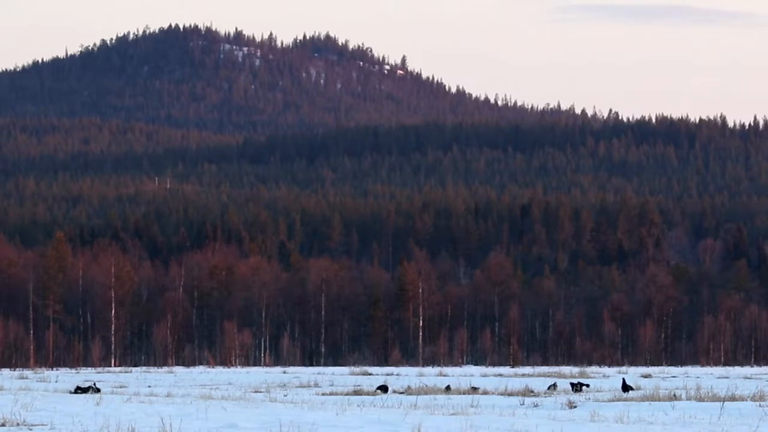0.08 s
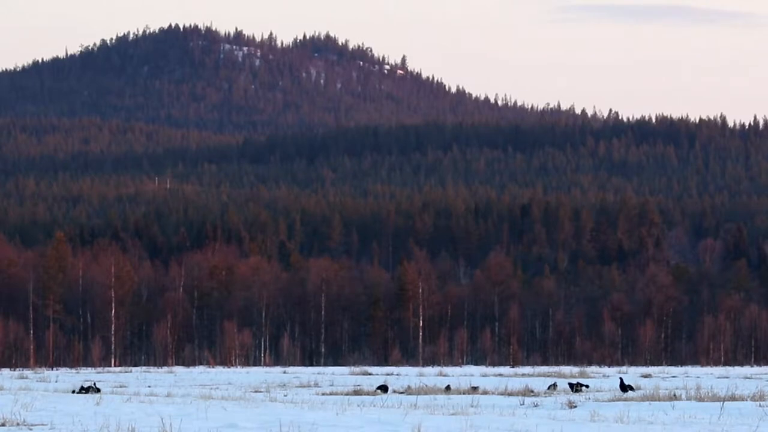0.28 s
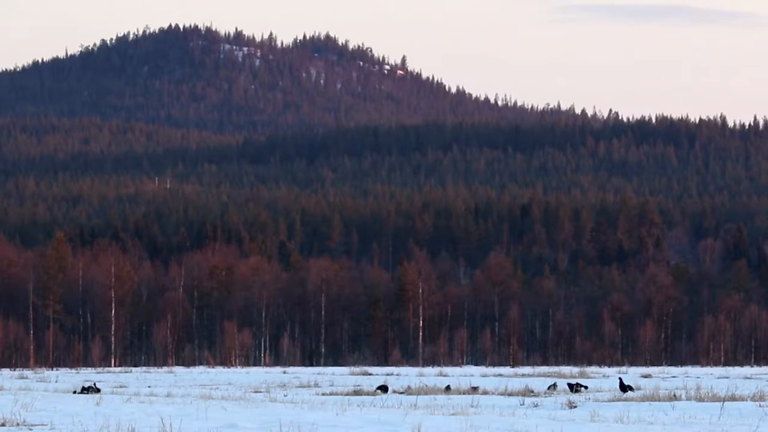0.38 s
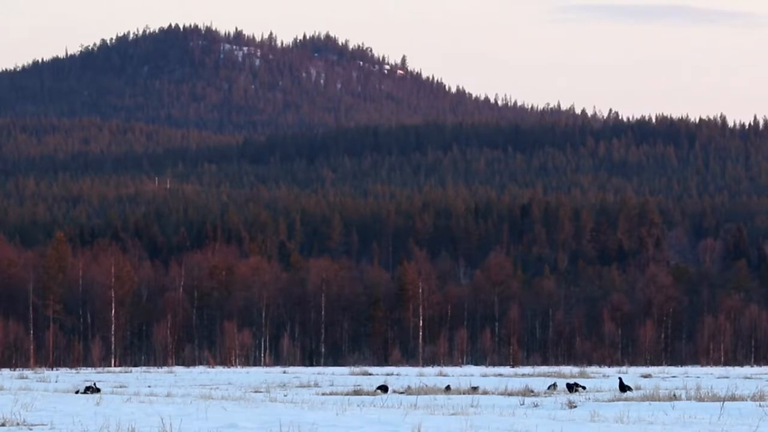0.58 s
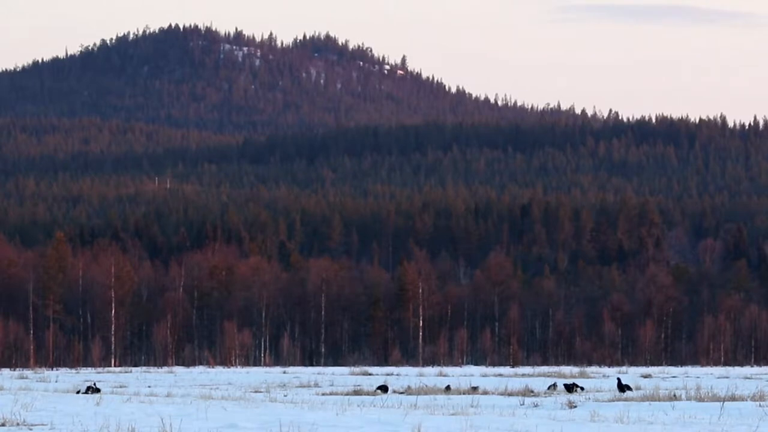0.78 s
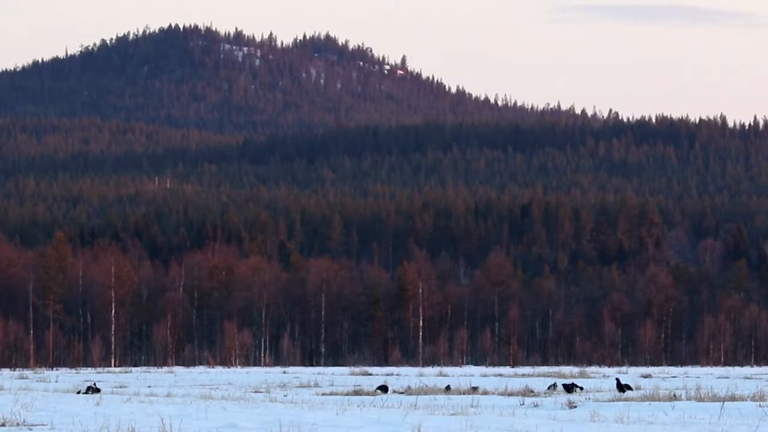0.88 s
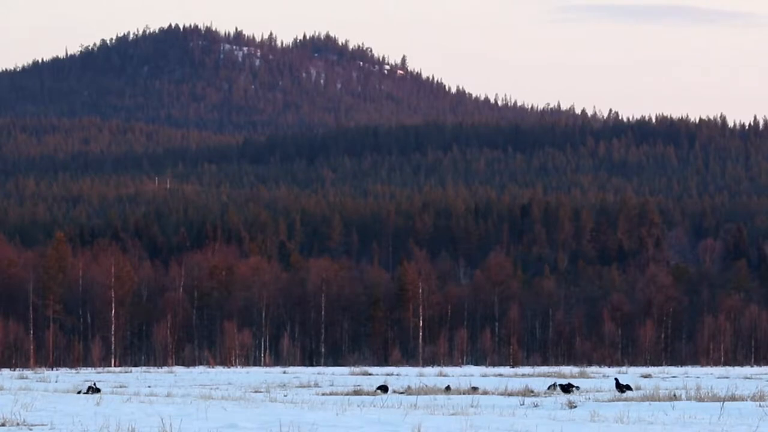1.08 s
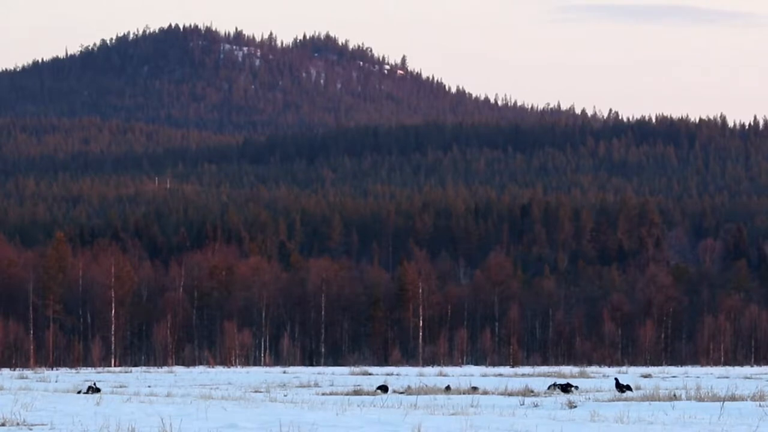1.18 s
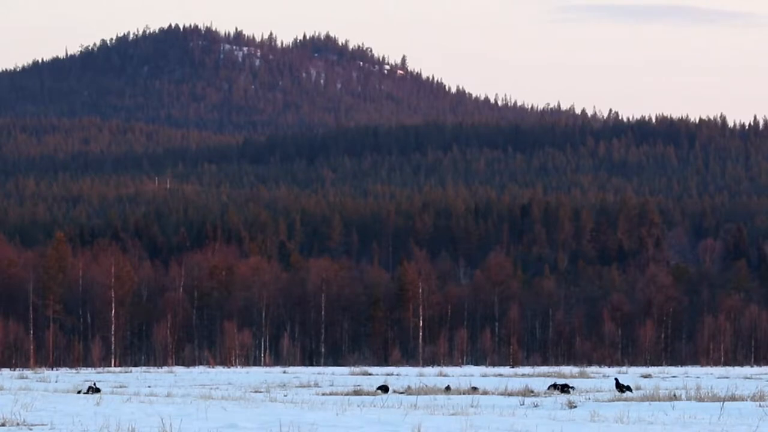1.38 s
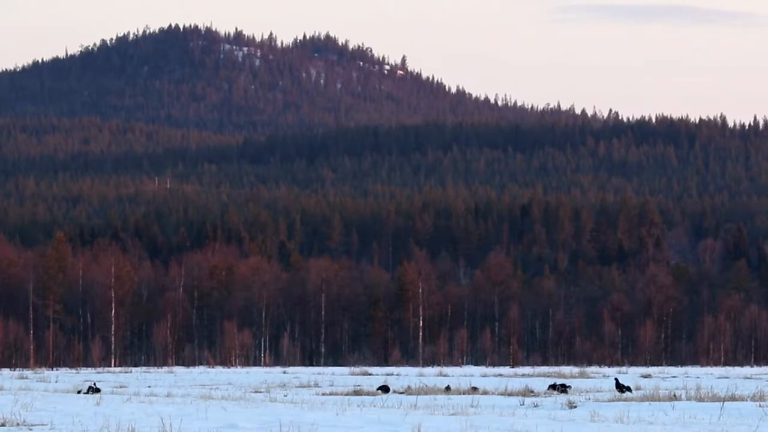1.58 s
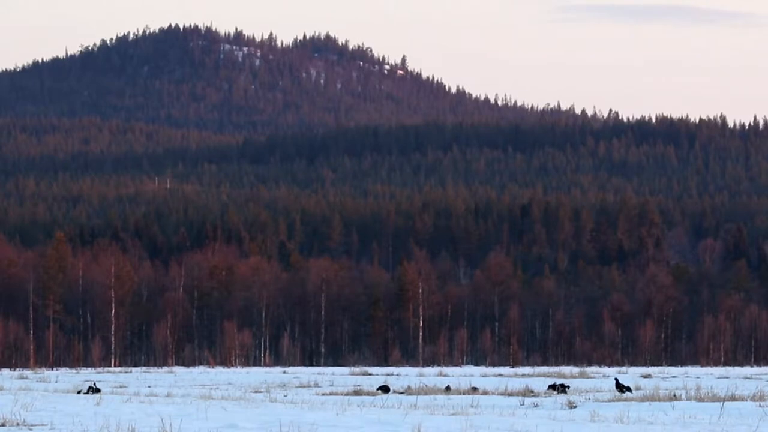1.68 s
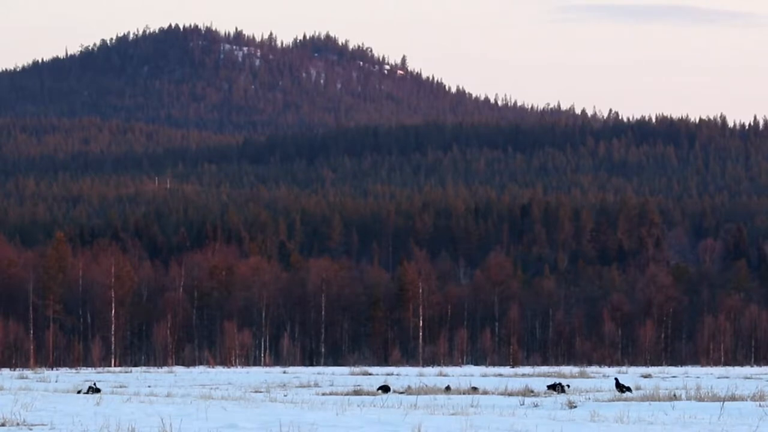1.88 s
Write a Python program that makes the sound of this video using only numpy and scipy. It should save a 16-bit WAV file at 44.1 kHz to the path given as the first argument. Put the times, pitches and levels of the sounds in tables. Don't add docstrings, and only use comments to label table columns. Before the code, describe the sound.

Hoarse, whistling two-part grouse hiss, with steady low bubbling, soft coos and faint wind

```python
import sys
import numpy as np
from scipy import signal
from scipy.io import wavfile
from scipy.ndimage import uniform_filter1d, map_coordinates

SR = 44100
rng = np.random.default_rng(int(sys.argv[2]) if len(sys.argv) > 2 else 0)


def master(y):
    cut = np.clip(np.atleast_2d(y).T, -1, 1)
    pcm = np.round(cut * 32767)
    wavfile.write(sys.argv[1], SR, pcm.astype(np.int16))


def elevation(decibels):
    levels = np.asarray(decibels, float)
    return 10 ** (levels / 20)


N = 83790


def evened(x):
    return x / np.sqrt(np.mean(abs(x) ** 2) + 1e-20)


def read(points, hz):
    f, value = np.transpose(points)
    return np.interp(np.log(hz + 1), np.log(f + 1), value)


def pan(db):
    return elevation(np.array([[.5], [-.5]]) * db)


def add(mix, start_s, sound):
    at = max(round(start_s * SR), 0)
    part = mix[:, at:at + sound.shape[1]]
    part += sound[:, :part.shape[1]]


def whistle(hz, width_hz, flatten=0):
    turn = np.exp(2j * np.pi * np.cumsum(hz * np.ones(N)) / SR)
    pace = np.cumsum(width_hz * np.ones(N)) / SR
    rows = rng.standard_normal((4000, 2))
    real, imaginary = (map_coordinates(row, [pace], order=3) for row in rows.T)
    z = real + 1j * imaginary
    return evened((turn * z / (abs(z) + .25) ** flatten).real)


def band(lo_hz, hi_hz):
    edges = signal.butter(3, [lo_hz, hi_hz], "band", fs=SR, output="sos")
    return evened(signal.sosfilt(edges, rng.standard_normal(N)))


def note(level_db, length_s, from_hz, to_hz, peak_at, pan_db):
    u = np.arange(0, length_s, 1 / SR) / length_s
    shape = np.sin(np.pi * u ** (np.log(.5) / np.log(peak_at))) ** 1.4
    a, b = rng.random(2)
    wobble = 1 + .012 * np.sin(2 * np.pi * (a + 1.31 * u))
    hz = (from_hz + (to_hz - from_hz) * u) * wobble
    return elevation(level_db) * pan(pan_db) * shape * np.sin(2 * np.pi * (b + np.cumsum(hz) / SR))


# (pitch [Hz], level [dB per Hz])
AIR_COLOUR = [(20, -7), (60, 0), (200, -4), (330, -0.5), (700, -9.5), (1400, -13.5), (3000, -18),
              (16000, -19)]
# (pitch [Hz], likeness [-1 to 1])
AIR_LIKENESS = [(30, 0.76), (300, 0.86), (700, 0.39), (2000, 0.1), (5000, 0.17), (15000, 0.033)]


def air():
    frames, hz = N // 256 + 5, np.fft.rfftfreq(1024, 1 / SR)
    a, b, c, d, patches = rng.standard_normal((frames, 513, 5)).T
    patches = evened(uniform_filter1d(uniform_filter1d(patches, 8, 0), 14, 1))
    same = np.clip(read(AIR_LIKENESS, hz), -1, 1)[:, None]
    left = a + 1j * b
    right = same * left + np.sqrt(1 - same ** 2) * (c + 1j * d)
    z = np.array([left, right]) * elevation(read(AIR_COLOUR, hz)[:, None] + .8 * patches)
    return elevation(-36.5) * evened(signal.istft(z, nperseg=1024, noverlap=768)[1][:, :N])


def far_chorus():
    mix, notes_per_s = np.zeros((2, N)), 110
    for when, a, b, c in rng.standard_normal((300, 4)):
        s = (when * 1000 % 1) * 300 / notes_per_s
        hz = 480 + 45 * a
        if s < N / SR:
            add(mix, s, note(-45 + 2.5 * b, .035, hz + 30, hz - 30, .55, 3 * c))
    return mix


# (middle time [s], level [dB], length [s], start pitch [Hz], end pitch [Hz])
COO_NOTES = [(.013, -24, .032, 390, 550), (.037, -30, .04, 560, 540), (.065, -25, .035, 400, 560),
             (.118, -24, .045, 510, 405), (.126, -27, .03, 570, 590), (.207, -25, .045, 560, 605),
             (.245, -32, .04, 480, 520), (.28, -32, .03, 480, 455), (.313, -25, .035, 610, 550),
             (.33, -26, .035, 520, 410), (.468, -32, .035, 510, 490), (.542, -31, .045, 520, 460),
             (.942, -31, .03, 460, 500), (1.057, -29, .035, 540, 490), (1.143, -31, .03, 490, 480),
             (1.203, -31, .025, 465, 455), (1.283, -32, .035, 490, 530), (1.357, -31, .03, 500, 475),
             (1.423, -32, .03, 420, 480), (1.521, -26, .03, 465, 475), (1.745, -31, .025, 480, 450),
             (1.764, -23, .026, 575, 525), (1.826, -27, .035, 420, 540), (1.851, -25, .045, 575, 565),
             (1.884, -27, .05, 540, 440)]


def cooing_cocks():
    mix = np.zeros((2, N))
    for s, db, length, from_hz, to_hz in COO_NOTES:
        pan_db = .008 * (from_hz + to_hz - 2 * 480)
        add(mix, s - length / 2, note(db, length, from_hz, to_hz, 0.46, pan_db))
    return mix


def bog(birds):
    t = np.arange(N) / SR
    taps = rng.choice([-1., 1.], (2, N)) * (rng.random((2, N)) < .05)
    taps = 1.04 * taps + 0.47 * taps[::-1]
    near = (t > .004) * elevation(-60 * t / .2)
    forest = elevation(-60 * t / 5.8)
    tail = 0
    for db, shape in [(-16, near), (-30.5, forest)]:
        tail = tail + elevation(db) * taps * shape / np.linalg.norm(taps[0] * shape)
    return signal.fftconvolve(birds, tail, axes=1)[:, :N]


# (time [s], length [s], level [dB], centre pitch [Hz], width [Hz])
AIR_PUFFS = [
    (.13, .05, -46, 3000, 1500),
    (1.46, .045, -46, 2250, 800),
    (.475, .05, -48, 3000, 1500),
]


def puffs():
    t, mix = np.arange(N) / SR, 0
    for at, length, db, hz, width_hz in AIR_PUFFS:
        mix = mix + elevation(db) * np.exp(-((t - at) / length * 4) ** 2) * whistle(hz, width_hz)
    return mix


def windpipe(throat_hz, beak_db):
    pipe_hz = 1480
    pulled_hz = pipe_hz + 0.67 * (throat_hz - pipe_hz)
    pipe = elevation(-10 + .4 * (beak_db + 25.5)) * whistle(pulled_hz, 600)
    skirt = elevation(-26.5 + 0.96 * (beak_db + 23.5)) * band(1000, 2440)
    haze = elevation(-14) * whistle(1560, 480)
    return pipe + skirt + haze


def beak(beak_db):
    ring = whistle(2668, 420) + elevation(-2) * whistle(2910, 800)
    sizzle = band(2490, 4670) + elevation(-7) * whistle(4650, 700)
    high = elevation(beak_db) * evened(ring) + elevation(-18.5 + 0.43 * (beak_db + 14)) * sizzle
    return high + 0.36 * np.array([np.roll(high, 900), np.roll(high, -700)])


# (time [s], effort [dB], throat pitch [Hz], beak opening [dB],
# whistle share [0-1], throat width [Hz])
HISS_PATH = [(0.185, -52.5, 1620, 6.5, 0.5, 298.4), (.214, -21.5, 1607, -9.5, .4, 262.5),
             (.305, -14, 1268, -27.5, 0.71, 119.4), (0.374, -21, 1136, -23.5, 0.77, 98.5),
             (0.418, -35, 1151, -13.5, 0.7, 120.2), (.53, -34, 1210, -17.5, .5, 150.1),
             (.655, -13.5, 1371, -31, 0.76, 129.5), (.77, -14.5, 1487, -28.5, 0.69, 130),
             (.8, -18, 1528, -23.5, 0.4, 260.8), (0.922, -28, 1590, -5, 0.22, 300),
             (1.014, -33.5, 1579, -4.5, 0.25, 301.2), (1.07, -59, 1430, -13, 0.04, 307)]


def hissing_cock():
    t, (s, *columns) = np.arange(N) / SR, np.transpose(HISS_PATH)
    smooth = (uniform_filter1d(np.interp(t, s, column), 300) for column in columns)
    effort_db, hz, beak_db, share, width_hz = smooth
    share = np.clip(share, 0, 1)
    throat = np.sqrt(share) * whistle(hz, width_hz, flatten=.6)
    throat = throat + np.sqrt(1 - share) * whistle(hz, 2 * width_hz)
    breathing = (t < s[-1]) * (t > s[0])
    return elevation(effort_db) * breathing * (throat + windpipe(hz, beak_db) + beak(beak_db))


# (peak time [s], level [dB], pitch at peak [Hz], length [s])
BUBBLE_NOTES = [(.387, -32, 449, .035), (0.456, -28, 435, 0.016), (0.52, -34, 434.7, 0.045),
                (0.594, -27, 436, 0.031), (0.671, -24.5, 436.4, 0.041), (0.74, -27.5, 429.1, 0.039),
                (0.82, -27.5, 422.7, 0.034), (.888, -29, 423.6, .045), (0.965, -25.5, 437.5, 0.024),
                (1.037, -25, 431, 0.022), (1.105, -26, 430, .04), (1.179, -27, 432, 0.035),
                (1.256, -26, 437, 0.049), (1.32, -23, 445, .04), (1.399, -28, 436, 0.041),
                (1.472, -23, 457.7, 0.046), (1.561, -24.5, 434.3, 0.092), (1.631, -23, 464, 0.087),
                (1.695, -25, 471, .04)]


def bubbling_cock():
    mix = np.zeros((2, N))
    sag_hz, peak_at = 105, .66
    for s, db, hz, length in BUBBLE_NOTES:
        top_hz = hz + sag_hz * peak_at
        add(mix, s - peak_at * length, note(db, length, top_hz, top_hz - sag_hz, peak_at, -0.67))
    return mix


# (time [s], level [dB], throat pitch [Hz])
DISTANT_PATH = [
    (1.048, -37, 1380),
    (1.221, -54, 1355),
    (1.299, -40, 1491),
    (1.37, -45.5, 1295),
    (1.5, -46.5, 1344),
    (1.68, -44.5, 1335),
    (1.9, -48, 1387),
]


def distant_cock():
    t, (s, db, hz) = np.arange(N) / SR, np.transpose(DISTANT_PATH)
    shared, left, right = (whistle(np.interp(t, s, hz), 520) for _ in range(3))
    level = elevation(np.interp(t, s, db)) * np.clip((t - s[0]) / 0.083, 0, 1)
    return level * pan(-3) * (0.6 * shared + .5 * np.array([left, right]))


def scene():
    birds = (hissing_cock() + puffs()) * pan(1.2)
    birds = birds + bubbling_cock() + cooing_cocks() + far_chorus()
    return birds + bog(birds) + distant_cock() + air()


def top_cut(x):
    return signal.sosfilt(signal.butter(12, 16650, fs=SR, output="sos"), x)


def record(dry):
    limit_db, knee = -8.5, 4.0
    swell = uniform_filter1d(abs(signal.hilbert(dry, axis=1)).max(0), 90)
    held = dry / (1 + (swell / elevation(limit_db)) ** knee) ** (1 / knee)
    lowpass = signal.firwin(511, 15800, window=("kaiser", 9), fs=SR)
    mix = signal.oaconvolve(held, lowpass[None], "same")
    return top_cut(mix)


dry = scene()
out = record(dry)
master(out)
```